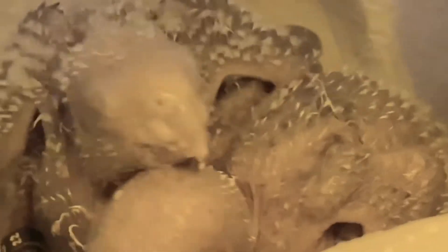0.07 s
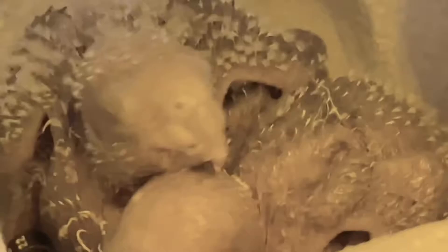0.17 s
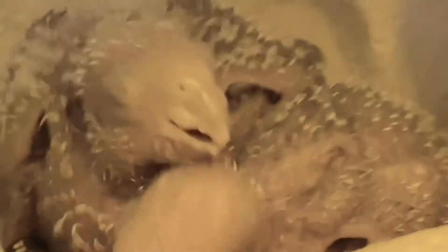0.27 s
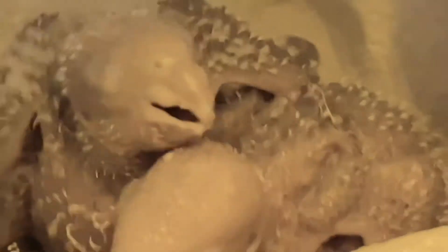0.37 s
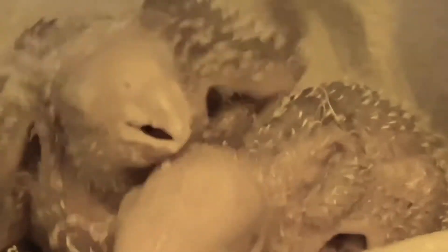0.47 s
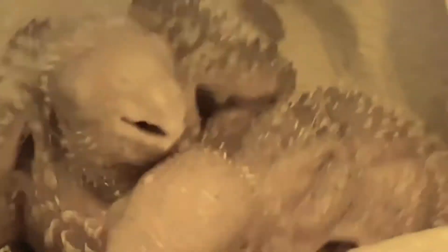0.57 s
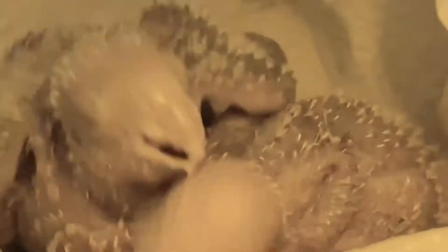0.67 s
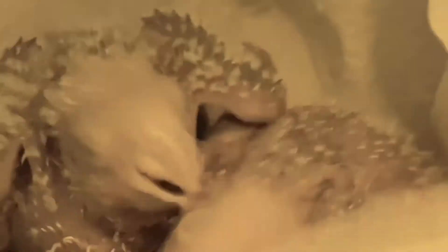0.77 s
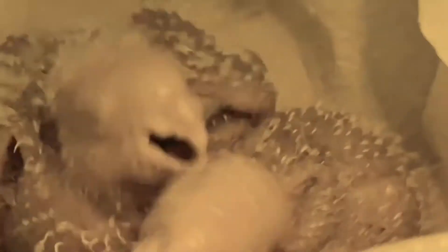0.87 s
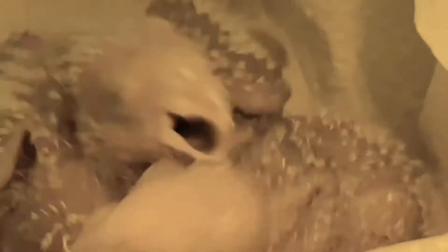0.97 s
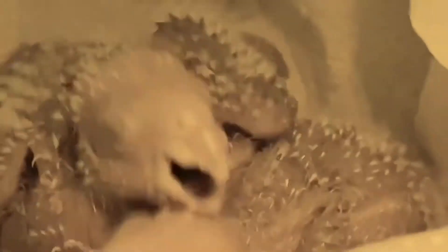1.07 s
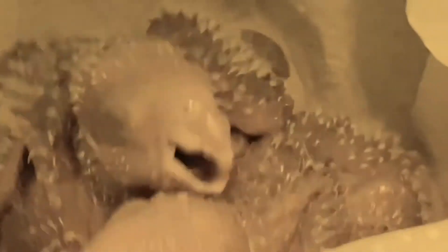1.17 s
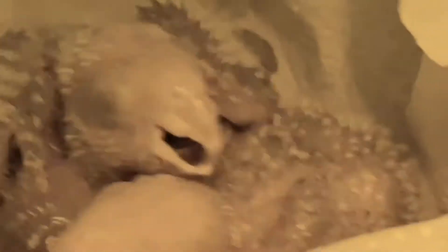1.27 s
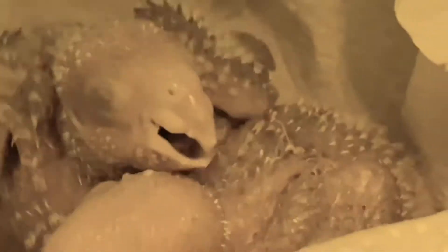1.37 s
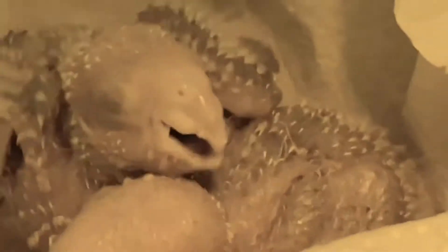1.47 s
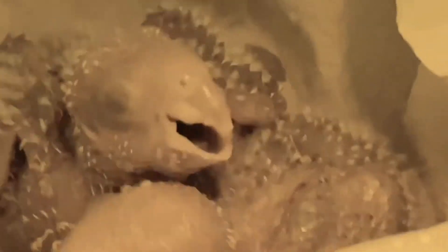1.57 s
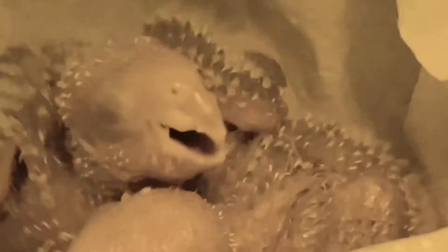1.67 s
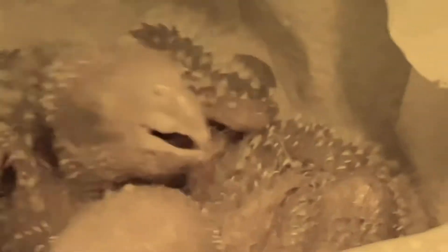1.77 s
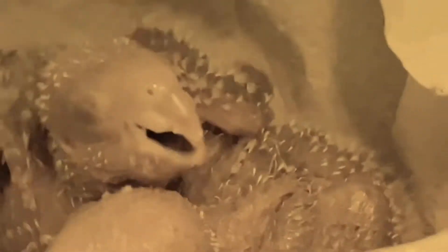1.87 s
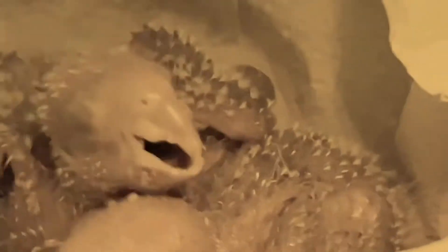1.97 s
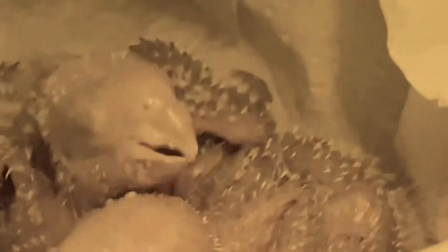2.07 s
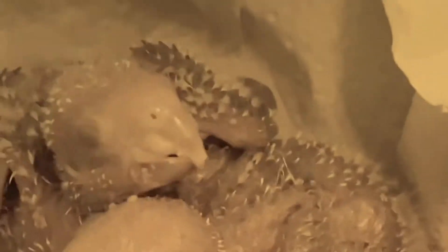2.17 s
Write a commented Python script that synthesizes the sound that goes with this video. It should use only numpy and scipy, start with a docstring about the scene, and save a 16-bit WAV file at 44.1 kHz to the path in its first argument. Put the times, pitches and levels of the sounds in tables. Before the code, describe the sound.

Close stereo pickup inside a small brooder: one brief high whistle, then a steady run of harsh, piercing chick chirps with quiet peeps between, a second chick's thin whistle, soft body bumps and low airy hum.

```python
"""In a small brooder, close to the microphone, parrot chicks beg. One chirps about eight times a second:
a rasp of jittery harmonics climbs and breaks into noise, snaps into an arched, nearly pure whistle,
then tumbles off in pitch; soft reedy peeps fall in between. A second chick whistles thinly.
The heater is a wavering sine in coloured noise; bodies bump on the bedding as short low sines.
Near walls and a very short ring surround the calls, which reach two microphone ports out of phase."""
import sys
import numpy as np
from scipy import signal
from scipy.fft import rfft, irfft, next_fast_len
from scipy.io import wavfile
from scipy.ndimage import map_coordinates

SR = 44100
rng = np.random.default_rng(int(sys.argv[2]) if len(sys.argv) > 2 else 0)


def digitize_waveform(pressure):
    """Quantize a signal to 16-bit integers and store it at the path in sys.argv[1].

    Rows of a 2-D input are taken as channels; values are limited to [-1, 1].
    """
    field = np.atleast_2d(pressure).T
    bounded = np.clip(field, -1, 1)
    quanta = np.round(bounded * 32767).astype(np.int16)
    wavfile.write(sys.argv[1], SR, quanta)


N = 99225  # samples, 2.25 s

# Levels and colours in the tables are relative: the *_TRIM_DB settings and envelopes act on top.
# Heater air spectrum: (frequency [Hz], level [dB])
AIR_COLOUR = [(15, -73), (25, -24), (114, 0), (190, -18), (229, -16), (384, -19.5), (476, -13.5),
              (531, -21.5), (607, -19), (962, -32), (10100, -62), (11300, -64.5), (16000, -91)]
# Slow movement of the air: (time [s], level [dB])
AIR_LEVEL = [(0.04, -45.5), (0.67, -42.5), (0.83, -40), (1.12, -50.5), (1.65, -48.5), (2.24, -46)]
HUM_HZ, HUM_DB, HUM_WAVER_DB = 113.8, -59, 5.5
AIR_TRIM_DB, AIR_SIDE_DB = -3.5, -3.5  # side: left-right difference against the middle

# Whistles with no rasp: (time [s], length [s], start pitch [Hz], top pitch [Hz], end pitch [Hz],
# level [dB], overtone level [dB], tumble level [dB])
WHISTLES = [(0.2, 0.05, 3210, 5290, 4464, -26, -40, -24), (0.44, 0.17, 5250, 5296, 5180, -58.5, -70, -79),
            (1.322, 0.18, 4960, 5650, 4900, -41.5, -49, -76),
            (1.439, .152, 5363, 5194, 5330, -34, -51.5, -66)]
# Pitch arch: ends as shares of the top pitch, place of the top as a share of the note, curve powers
ARCH_START, ARCH_END, ARCH_PEAK, RISE_POWER, FALL_POWER = .9, .85, .56, 1.9, 2.4
OVERTONE_TRIM_DB, WHISTLE_AIR_DB = 4.5, -27.5
WHISTLE_JITTER, FLUTTER_DB, FLUTTER_RATE = .005, 4.5, 330  # share of pitch, dB, knots a second
OVERTONE_FOCUS = 0.433  # power of the overtone's bloom; higher is narrower

# Throat colour of the tumble: (frequency [Hz], level [dB])
TUMBLE_COLOUR = [(700, -24), (1900, -13.5), (2600, -6.5), (3400, -10.5), (4700, 3), (6500, -4.5),
                 (9000, -11.5), (11000, -13.5), (13000, -54.5)]
TUMBLE_S, TUMBLE_END_HZ, TUMBLE_FADE_DB, TUMBLE_TRIM_DB, TUMBLE_NOISE_DB = 0.011, 1962, 25, 1, -9
SHIMMER_DB = 4  # random movement of each harmonic

# Bumps on the bedding: (time [s], length [s], pitch [Hz], level [dB])
BUMPS = [(.27, .07, 60.19, -49), (.405, .03, 148, -45), (.42, .05, 75, -42.5), (0.809, 0.028, 173.2, -38),
         (0.839, 0.055, 73.2, -47), (.93, .065, 63.5, -44.5)]

# Chirps: (time [s], rasp length [s], whistle length [s], top pitch [Hz], rasp pitch [Hz], rasp level [dB],
# whistle level [dB], swell at the top [dB], overtone level [dB], tumble level [dB])
CHIRPS = [(0.295,0.014,0.037,5490,1230,-24,-21.5,-1,-30.5,-25.5),
          (0.392,0.015,0.035,5458,1210,-23.5,-21,0.5,-31.5,-24),
          (0.488,0.017,.033,5430,1200,-20,-17.5,-7.5,-33.5,-21),
          (0.588,0.017,0.033,5454,1220,-17.5,-17,-12.5,-31,-18.5),
          (.692,0.018,.034,5392,1240,-19.5,-18,-13,-34,-20),
          (0.794,0.023,0.032,5498,1250,-19,-17.5,0.5,-24.5,-21),
          (.906,0.017,0.036,5605,1260,-15.5,-17.5,-13,-22.5,-22),
          (1.034,0.015,0.043,5767,1220,-17,-16,18.5,-29,-30.5),
          (1.149,0.019,.036,5686,1220,-24.5,-22,12,-30.5,-31.5),
          (1.269,0.02,0.036,5690,1230,-24.5,-22.5,1,-31,-26),
          (1.385,.019,.039,5650,1290,-23,-22.5,4.5,-30.5,-22.5),
          (1.513,.02,.038,5566,1220,-22.5,-21,3,-30.5,-21.5),
          (1.642,0.02,.038,5602,1240,-21.5,-22.5,1.5,-29.5,-23),
          (1.782,0.027,.036,5600,1240,-20.5,-20.5,1,-24,-18.5),
          (1.911,0.03,0.034,5560,1250,-22,-21,-3,-26.5,-21)]
# Climb of the rasp: (share of the rasp [0-1], pitch over the rasp pitch [ratio])
RASP_GLIDE = [(0, 0.82), (.3, 1), (.68, 1.16), (.8, 1.45), (1, 1.8)]
# Throat colour of the rasp and of the whistle's breath: (frequency [Hz], level [dB])
RASP_COLOUR = [(700, -21), (1200, -11.5), (1800, -13.5), (2400, -16.5), (2900, 1), (3300, -9.5),
               (4150, 7.5), (4700, 4), (6200, 2), (7500, 2), (8400, -6), (9600, -4), (11000, 0.5),
               (12300, -17.5), (13500, -25.5), (15500, -35)]
RASP_JITTER, RASP_NOISE_DB, RASP_BREAK_DB = .015, -9, 13  # share of pitch, dB, added dB once broken
BREAK_FROM, BREAK_OVER = .58, .25  # shares of the rasp: where the voice breaks and how long that takes
RASP_ATTACK_S, RASP_TRIM_DB, CHIRP_WHISTLE_TRIM_DB = .003, -1, 0.5
OVERLAP_S = .002  # crossing of rasp and whistle

# Peeps between the chirps: (time [s], length [s], pitch [Hz], level [dB])
PEEPS = [(0.565, 0.013, 940, -59), (0.675, 0.019, 906, -65), (0.876, 0.02, 1096, -40),
         (0.986, 0.04, 1038, -46.5), (1.118, 0.025, 1020, -55), (1.232, 0.026, 1065, -49),
         (1.35, 0.031, 1075, -51.5), (1.469, 0.038, 1070, -48.5), (1.596, 0.037, 1085, -47.5),
         (1.729, 0.038, 1093, -44.5), (1.874, 0.026, 1016, -48.5), (2.001, 0.049, 1121, -41)]
# Throat colour of the peep: (frequency [Hz], level [dB])
PEEP_COLOUR = [(1050, -7), (2150, -9.5), (3200, -5.5), (4300, 5), (5300, -12), (6300, -6.5), (7700, -7.5),
               (8800, -16), (9800, -39.5), (11100, -11), (12500, -52.5), (15000, -68.5)]
PEEP_TRIM_DB, PEEP_JITTER, PEEP_SAG, PEEP_PEAK, PEEP_FADE_DB = 8, .008, .26, .2, 12

# First echoes from the walls: (delay [s], gain [ratio])
WALLS = [(.0011, 0.14), (.0023, -0.12), (.0037, 0.17), (.0056, .12), (.0078, -.09)]
BOX_T60_S, BOX_DB = .055, -10
# Lead of the left port over the right: (frequency [Hz], phase [rad])
PORT_PHASE = [(0, 1), (2000, 0), (3000, 0.65), (5300, 0.5), (6400, 0.3), (8700, 0.5), (10000, -2.5),
              (11000, -4.5), (11800, -5), (12600, -18), (15000, -19)]
TOP_HZ = 16000  # band limit


def amp(db):
    """Decibels to amplitude."""
    return 10 ** (np.asarray(db) / 20)


def unit(x):
    """Scales x to an rms of 1."""
    return x / np.sqrt(np.mean(x ** 2) + 1e-20)


def along(points, hz):
    """Reads a (frequency [Hz], value) table along a log axis."""
    f, v = np.transpose(points)
    return np.interp(np.log(hz + 1), np.log(f + 1), v)


def wobble(n, rate):
    """A smooth random curve with rate knots a second."""
    return map_coordinates(rng.standard_normal(8192), [np.arange(n) * rate / SR], mode="wrap")


def filtered(x, response):
    """Applies a response given as a function of frequency."""
    n = x.shape[-1]
    m = next_fast_len(n + 4096)
    return irfft(rfft(x, m) * response(np.fft.rfftfreq(m, 1 / SR)), m)[..., :n]


def noise(n, colour):
    """Coloured noise of rms 1."""
    white = rng.standard_normal(N)[:n]
    return unit(filtered(white, lambda hz: amp(along(colour, hz))))


def cycles(hz):
    """Phase in radians of a moving pitch."""
    return 2 * np.pi * np.cumsum(hz) / SR


def progress(length_s):
    """Runs from 0 to 1 through a note."""
    return np.linspace(0, 1, int(length_s * SR))


def gate(n, attack_s, release_s):
    """Straight attack and release."""
    t = np.arange(n) / SR
    return np.minimum(t / attack_s, 1) * np.minimum(t[::-1] / release_s, 1)


def add(out, s, x):
    """Mixes x in at time s."""
    i = max(round(s * SR), 0)
    out[i:i + len(x)] += x[:N - i]


def heater():
    """A wavering low hum in softly moving air that spreads across both channels."""
    waver = amp(HUM_DB + HUM_WAVER_DB * wobble(N, 8.9))
    hum = np.sqrt(2) * waver * np.sin(cycles(HUM_HZ * (1 + .02 * wobble(N, 19))))
    middle = noise(N, AIR_COLOUR)
    side = amp(AIR_SIDE_DB) * np.array([[1], [-1]]) * noise(N, AIR_COLOUR)
    air_db = AIR_TRIM_DB + np.interp(np.arange(N) / SR, *np.transpose(AIR_LEVEL))
    return hum + (middle + side) * amp(air_db)


def arch(u, start, end):
    """Pitch over its top value: up from start, down to end."""
    rise = (1 - start) * np.abs(1 - u / ARCH_PEAK) ** RISE_POWER
    fall = (1 - end) * np.abs((u - ARCH_PEAK) / (1 - ARCH_PEAK)) ** FALL_POWER
    return 1 - np.where(u < ARCH_PEAK, rise, fall)


def whistle(hz, db, overtone_db, swell_db=0):
    """A nearly pure tone, fluttering most on its flanks; its overtone blooms mid-note, with a little breath."""
    n = len(hz)
    top = np.abs(np.hanning(n))
    phase = cycles(hz * (1 + WHISTLE_JITTER * wobble(n, 653)))
    flutter_db = FLUTTER_DB * (1 - .7 * top) * wobble(n, FLUTTER_RATE)
    level = unit(amp(swell_db * top + flutter_db))
    bloom = unit(top ** OVERTONE_FOCUS * amp(FLUTTER_DB / 2 * wobble(n, FLUTTER_RATE)))
    tone = amp(db) * level * np.sin(phase)
    overtone = amp(overtone_db + OVERTONE_TRIM_DB) * bloom * np.sin(2 * phase)
    breath = amp(db + WHISTLE_AIR_DB) * noise(n, RASP_COLOUR)
    return np.sqrt(2) * (tone + overtone) + breath


def reed(hz, colour, jitter):
    """Shimmering harmonics of a jittery pitch, coloured by the throat."""
    phase = cycles(hz * (1 + jitter * wobble(len(hz), 1500)))
    k = np.arange(1, 15)[:, None]  # harmonic numbers
    shimmer_db = SHIMMER_DB * np.array([wobble(len(hz), 91.7) for _ in k])
    level = amp(along(colour, k * hz) + shimmer_db) * (k * hz < TOP_HZ)
    waves = np.sin(k * phase + rng.uniform(0, 2 * np.pi, k.shape))
    return unit(np.sum(level * waves, 0))


def tumble(from_hz, db):
    """The pitch collapses roughly as the whistle ends: a falling, fading reed with noise."""
    u = progress(TUMBLE_S)
    voiced = reed(from_hz * (TUMBLE_END_HZ / from_hz) ** u, TUMBLE_COLOUR, RASP_JITTER)
    fall = voiced + amp(TUMBLE_NOISE_DB) * noise(len(u), TUMBLE_COLOUR)
    return amp(db + TUMBLE_TRIM_DB - TUMBLE_FADE_DB * u) * unit(fall) * gate(len(u), .001, .002)


def thin_whistles():
    """Arched whistles with no rasp, each ending in a tumble."""
    out = np.zeros(N)
    for s, length_s, start_hz, top_hz, end_hz, db, overtone_db, tumble_db in WHISTLES:
        u = progress(length_s)
        hz = top_hz * arch(u, start_hz / top_hz, end_hz / top_hz)
        add(out, s, whistle(hz, db, overtone_db) * gate(len(u), 0.026, 0.006))
        add(out, s + length_s, tumble(end_hz, tumble_db))
    return out


def bumps():
    """Dull pushes of the bodies against the bedding: low sines of unsteady pitch, quick to swell."""
    out = np.zeros(N)
    for s, length_s, hz, db in BUMPS:
        u = progress(length_s)
        thud = np.sin(cycles(hz * (1 + .25 * wobble(len(u), 120))))
        add(out, s, amp(db) * unit(thud * np.sin(np.pi * u ** 0.23)))
    return out


def rasp(length_s, hz):
    """A reedy note that climbs, then breaks into noise."""
    u = progress(length_s)
    broken = np.clip((u - BREAK_FROM) / BREAK_OVER, 0, 1)
    voiced = reed(hz * np.interp(u, *np.transpose(RASP_GLIDE)), RASP_COLOUR, RASP_JITTER)
    hiss = amp(RASP_NOISE_DB + RASP_BREAK_DB * broken)
    mix = (voiced + hiss * noise(len(u), RASP_COLOUR)) / np.hypot(1, hiss)  # even power throughout
    return unit(mix) * gate(len(u), RASP_ATTACK_S, 0.00067)


def chirps():
    """Rasp, whistle and tumble follow one another without a gap."""
    out = np.zeros(N)
    for (s, rasp_s, whistle_s, top_hz, rasp_hz,
         rasp_db, whistle_db, swell_db, overtone_db, tumble_db) in CHIRPS:
        add(out, s, amp(rasp_db + RASP_TRIM_DB) * rasp(rasp_s + OVERLAP_S / 2, rasp_hz))
        u = progress(whistle_s + OVERLAP_S)
        hz = top_hz * arch(u, ARCH_START, ARCH_END)
        note = whistle(hz, whistle_db + CHIRP_WHISTLE_TRIM_DB, overtone_db, swell_db)
        add(out, s + rasp_s - OVERLAP_S / 2, note * gate(len(u), OVERLAP_S, OVERLAP_S))
        add(out, s + rasp_s + whistle_s, tumble(hz[-1], tumble_db))
    return out


def peeps():
    """Soft reedy notes between the chirps, sagging in pitch as they fade."""
    out = np.zeros(N)
    for s, length_s, hz, db in PEEPS:
        u = progress(length_s)
        note = reed(hz * (1 - PEEP_SAG * (u - PEEP_PEAK) ** 2), PEEP_COLOUR, PEEP_JITTER)
        level = amp(db + PEEP_TRIM_DB - PEEP_FADE_DB * u ** 2)
        add(out, s, level * note * gate(len(u), .002, 0.0029))
    return out


def brooder(x):
    """Near walls answer at once; the box rings very briefly as decaying noise."""
    t = np.arange(SR // 5) / SR
    tail = rng.standard_normal(len(t)) * amp(-60 * t / BOX_T60_S) * np.minimum(t / 0.0013, 1)
    echoes = lambda hz: 1 + sum(gain * np.exp(-2j * np.pi * hz * delay) for delay, gain in WALLS)
    ring = signal.fftconvolve(x, tail / np.linalg.norm(tail))[:N]
    return filtered(x, echoes) + amp(BOX_DB) * ring


def microphone(calls):
    """Two ports hear the calls at equal level, their phases parted by half the lead each way."""
    half_lead = .5j * np.array([[1], [-1]])
    return filtered(calls, lambda hz: np.exp(half_lead * np.interp(hz, *np.transpose(PORT_PHASE))))


def scene():
    """Calls pass through the brooder to both ports; bumps and heater are mixed in directly."""
    calls = brooder(chirps() + thin_whistles() + peeps())
    return microphone(calls) + bumps() + heater()


def record(dry):
    """Nothing is kept above the band limit."""
    return filtered(dry, lambda hz: hz < TOP_HZ)


dry = scene()
out = record(dry)
digitize_waveform(out)
```